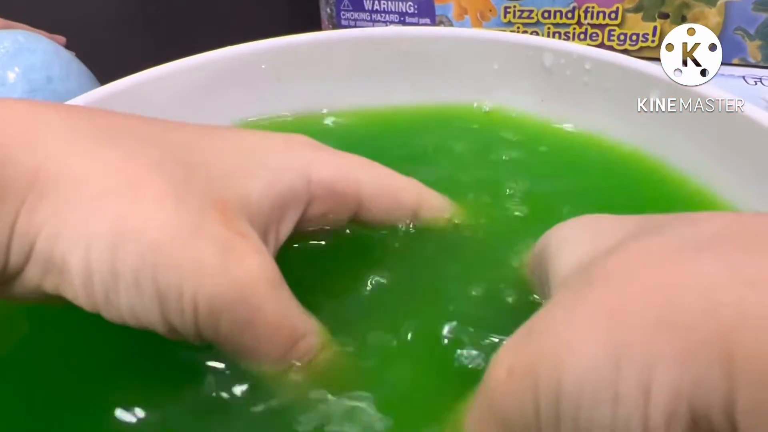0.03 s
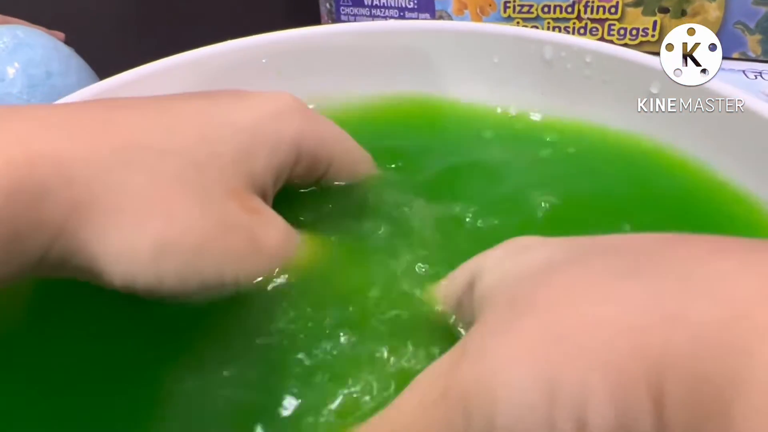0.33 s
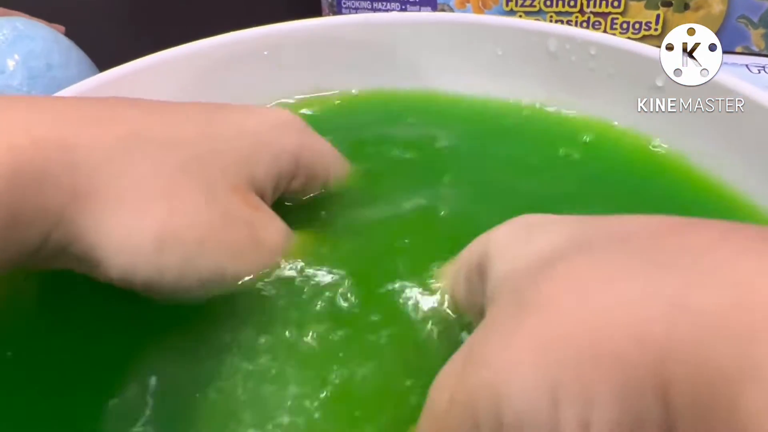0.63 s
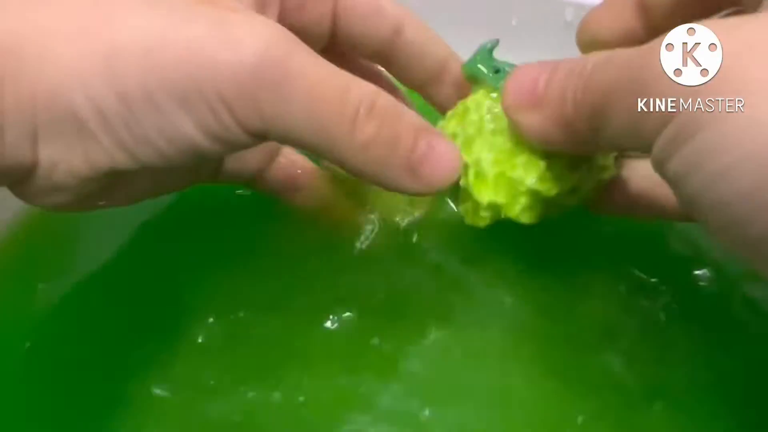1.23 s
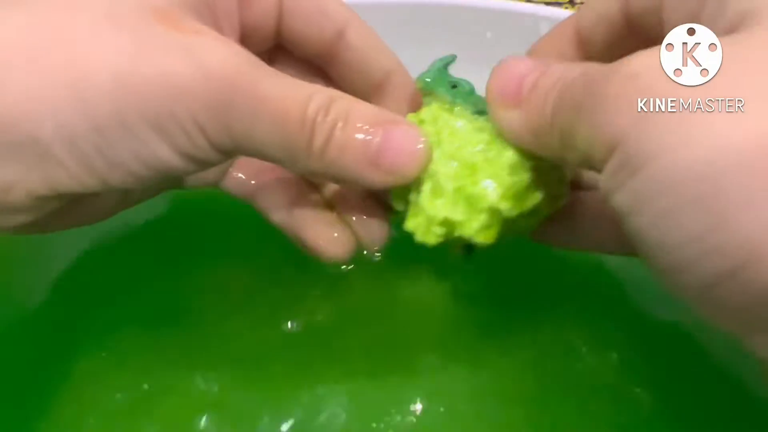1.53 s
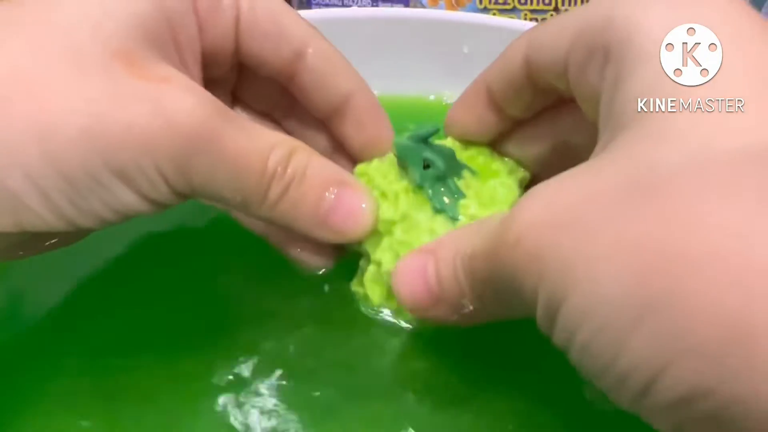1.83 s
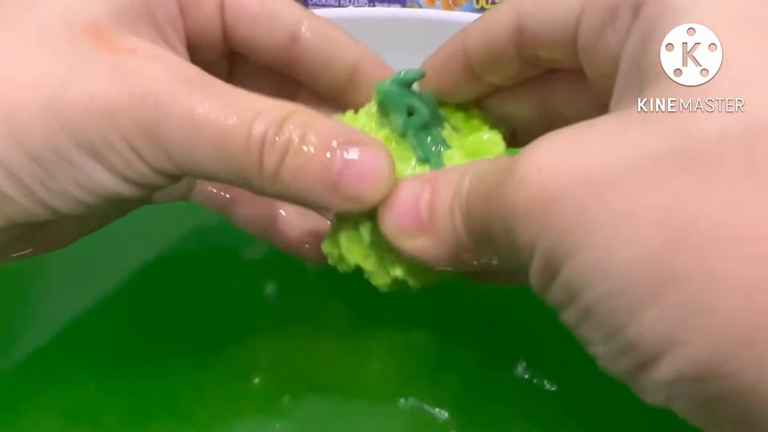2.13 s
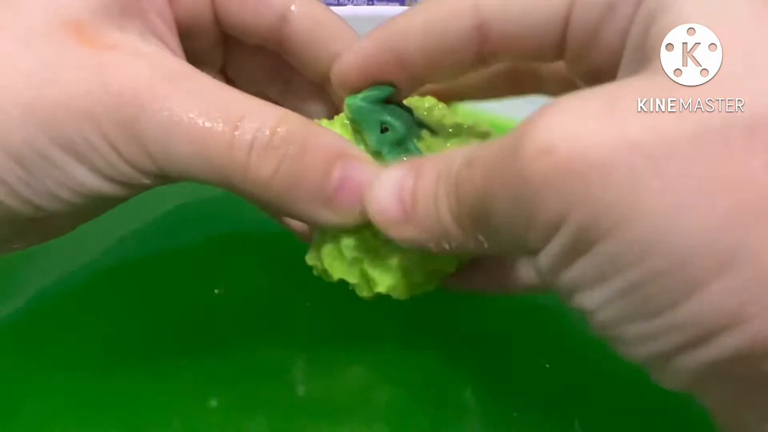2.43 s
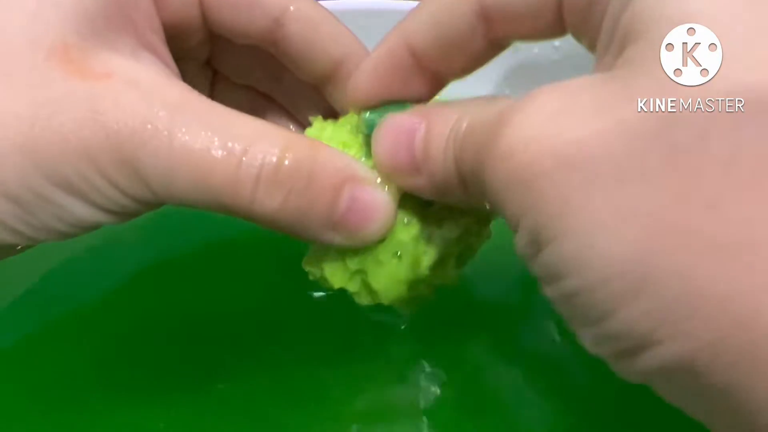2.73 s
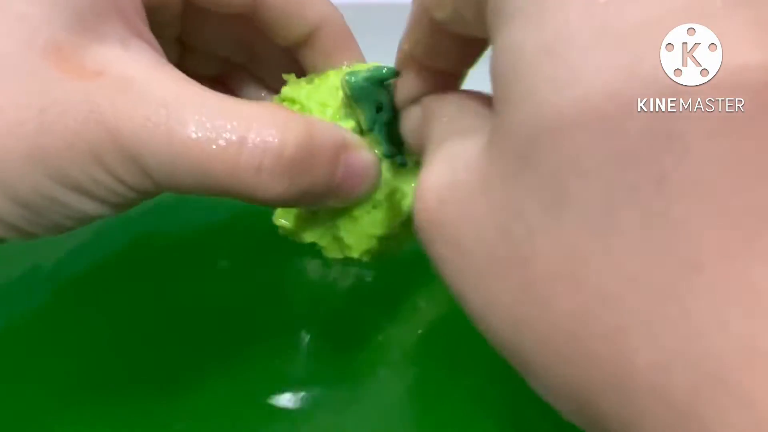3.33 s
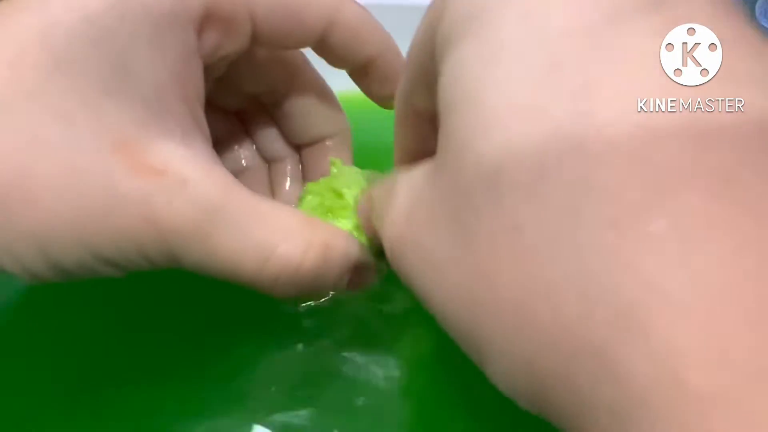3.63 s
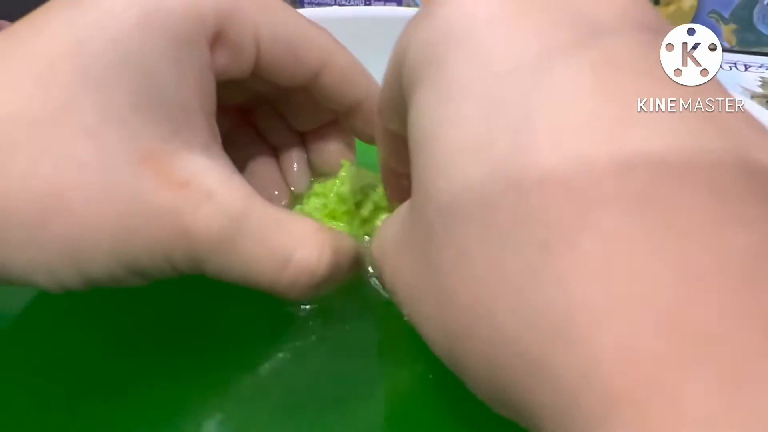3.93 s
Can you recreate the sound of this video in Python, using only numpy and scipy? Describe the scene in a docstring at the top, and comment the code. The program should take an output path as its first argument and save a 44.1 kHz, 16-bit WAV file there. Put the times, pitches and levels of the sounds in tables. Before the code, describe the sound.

Close to the microphone, a dissolving bath bomb gives a dense, high fizz throughout. Small splashes and sloshes in a plastic bowl come first, then wet, foamy crackling as hands hold it above the water. The room hums faintly.

```python
"""A fine, dense fizz is heard close by: a bath bomb releases gas in a plastic bowl of water, and each
bursting bubble rings briefly, the smaller the higher. Fingers fish for the bomb with small splashes
that set the bowl ringing, and lift it out at 1.2 s. The wet foam then crackles in the cupped hands,
a cavity resonator that rings higher as they close and lower the bomb back to the water.
The room hums quietly behind it all; the sound is mono."""
import sys
import numpy as np
from scipy import signal
from scipy.fft import rfft, irfft
from scipy.io import wavfile

SR = 44100
rng = np.random.default_rng(int(sys.argv[2]) if len(sys.argv) > 2 else 0)


def to_wav(sig):
    """Store sig (one row per channel, or 1-D mono) as 16-bit WAV at the path in sys.argv[1].

    Samples outside -1..1 are clipped; the rate is SR.
    """
    pcm = np.clip(np.atleast_2d(sig), -1, 1) * 32767
    pcm = np.round(pcm).astype(np.int16)
    wavfile.write(sys.argv[1], SR, pcm.T)  # frames by channels


N = 176400
TIME = np.arange(N) / SR

# fine fizz (time [s], level [dB])
FIZZ_LEVEL = [(0, -53), (.2, -54), (.33, -49), (.44, -48.5), (.6, -49.5), (.82, -51.5), (.93, -47.5),
              (1.05, -47.5), (1.25, -49.5), (1.6, -47.5), (1.9, -49), (2.1, -48), (2.64, -46), (3.1, -49.5),
              (3.42, -47.5), (3.65, -52.5), (3.92, -49), (4, -48)]
# its spectrum (frequency [Hz], relative density [dB])
FIZZ_SPECTRUM = [(1000, -24), (3500, -13.5), (5200, -13), (6500, -3), (7900, -5.5), (8700, 0.8),
                 (9500, -0.5), (11200, 0.5), (12300, -7), (14000, -22), (15700, -31)]
# sputtering, deepest while the bomb is under water (time [s], rms depth [dB])
SPUTTER_DEPTH = [(0, 2.5), (1.1, 3.5), (1.5, 0.94), (4, 1.27)]
# finest bubbles bursting in the open air (time [s], level [dB])
PRICKLE_LEVEL = [(0.0, -66), (0.01, -57), (0.57, -50.5), (0.7, -50.5), (1.04, -48.5), (2.0, -48.5),
                 (2.06, -47), (3.45, -48), (3.56, -51.5), (4.0, -49.5)]
# their spectrum (frequency [Hz], relative density [dB])
PRICKLE_SPECTRUM = [(6000, -33), (10500, -8), (12500, -6), (14000, -4), (15700, -3.5)]
# narrow band of sizzling fizz near 7.5 kHz (time [s], frequency [Hz], level [dB])
SIZZLE = [(0, 7900, -62), (.22, 7600, -61), (.55, 7950, -52.5), (.8, 7750, -55), (.94, 7360, -54.5),
          (1.2, 7600, -58.5), (1.45, 7430, -48.5), (1.85, 7400, -62), (2.06, 7600, -52.5),
          (2.75, 7450, -62), (3.25, 7500, -56.5), (3.6, 7300, -68), (4, 7300, -67)]
# two modes of the hollow of the hands (time [s], frequency [Hz], level before the high-pass [dB])
HAND_MODE_1 = [(0, 4600, -64.5), (.22, 4480, -68), (.45, 4540, -67), (1.12, 4200, -62.5),
               (1.3, 4700, -51.5), (1.85, 4630, -53), (2.1, 4740, -52), (2.55, 4750, -50.5),
               (2.76, 4800, -48.5), (2.88, 4550, -53), (3.25, 4820, -53), (3.46, 4800, -53.5),
               (3.58, 5300, -58), (3.9, 5870, -50), (4, 5600, -53)]
HAND_MODE_2 = [(0, 5800, -77), (.2, 5600, -70), (.5, 5640, -59.5), (1.1, 5750, -62), (1.27, 5830, -58),
               (1.7, 5900, -54.5), (2.4, 6060, -53.5), (2.75, 5300, -54.5), (3.2, 5940, -51),
               (3.48, 5950, -53.5), (3.58, 6250, -55), (3.9, 6550, -54), (4, 6300, -56)]
# deep resonance of the closed palms (time [s], level [dB])
PALM_LEVEL = [(0, -75), (1.2, -72), (1.7, -71), (1.83, -59), (2.1, -68.5), (2.8, -78), (3.0, -73),
              (3.12, -57.5), (3.24, -69.5), (3.45, -60), (3.6, -68), (4, -65)]
# coarse crackle of wet foam (time [s], level [dB])
FOAM_LEVEL = [(0, -86), (.08, -54.5), (.14, -72), (.22, -66), (.3, -62.5), (.6, -58.5), (.78, -56),
              (.97, -59), (1.1, -53.5), (1.5, -52), (1.85, -51), (2.42, -52.5), (2.7, -56.5), (2.92, -57.5),
              (3.13, -57.5), (3.46, -59), (3.55, -65.5), (3.72, -57.5), (4, -58.5)]
# its spectrum (frequency [Hz], relative density [dB])
FOAM_SPECTRUM = [(400, -10), (1100, -12), (1600, -4.5), (2300, -2.5), (2900, -5.5), (3500, -5),
                 (4500, -5.5), (7000, -18)]
# larger bubbles bursting (time [s], peak level [dB], frequency [Hz], decay time [s])
LARGE_BUBBLES = [(.270, -42, 3870, 0.00088), (.3668, -33.5, 4050, 0.00046), (.4022, -39, 3740, 0.00068),
                 (0.4143, -37.5, 4120, 0.0013), (0.4645, -39, 4570, 0.0012), (.665, -41, 5500, .002),
                 (0.7683, -43, 4600, 0.0033), (0.786, -37.5, 4540, 0.0014), (0.795, -41, 2850, 0.0016),
                 (0.9195, -41, 6450, .002), (0.9387, -38, 6620, .004), (1.076, -42, 2630, .002),
                 (1.122, -47, 2700, 0.0023), (1.159, -41, 2860, 0.0033), (1.184, -40.5, 3740, 0.0027),
                 (1.245, -42, 5700, 0.01), (1.336, -41, 4570, 0.0022), (1.402, -39, 4430, 0.0041),
                 (1.631, -40, 7600, .002), (1.994, -42, 4350, 0.0027), (2.021, -42, 4380, .002),
                 (2.054, -42, 7460, .002), (2.067, -38, 6060, .0015), (2.77, -39.5, 4450, 0.0023)]
# low gulps as the bomb leaves the water (time [s], peak level [dB], frequency [Hz], decay time [s])
GULPS = [(1.209, -43.5, 326, 0.0071), (1.216, -39.5, 206, 0.0058), (1.227, -35.5, 86, 0.015),
         (1.283, -42.5, 110, .015)]
# fingers striking the water (time [s], gain [dB], frequency [Hz])
SPLASHES = [(.068, -45.5, 1450), (.081, -46, 2230), (.211, -46, 1110), (.255, -39.5, 960),
            (.320, -38.5, 2000), (.337, -43, 1920), (.341, -40.5, 635), (.468, -37, 1100),
            (.485, -36, 1380), (0.5863, -36, 2030), (0.5881, -29, 910), (.5905, -35, 1240),
            (.595, -41, 810), (.5975, -31, 1560), (.602, -38, 1400), (.6165, -35.5, 1380),
            (.629, -39, 1100), (.74, -39.5, 1700), (.832, -41, 1840), (1.209, -54, 725), (1.22, -45, 447),
            (3.513, -45, 1490)]
# water sloshing round the fingers and squelching on the bomb (time [s], level [dB])
SLOSH_LEVEL = [(0, -72), (.09, -58), (.18, -59), (.28, -55.5), (.35, -60), (.42, -57), (.5, -58.5),
               (.56, -55), (.61, -55), (.68, -62), (1.0, -69), (1.17, -74), (1.22, -54), (1.33, -66),
               (1.7, -68), (2.3, -62.5), (2.6, -69.5), (3.19, -64), (3.27, -56), (3.34, -70), (3.46, -57.5),
               (3.58, -75), (4, -76)]
# its spectrum (frequency [Hz], relative density [dB])
SLOSH_SPECTRUM = [(200, -23), (450, -0.5), (680, -1.5), (830, -5), (1000, -0.5), (1400, -7.5),
                  (2200, -15.5), (4000, -16)]
# modes of the plastic bowl (frequency [Hz], relative level [dB], time to fall 60 dB [s])
BOWL_MODES = [(713, 21.5, 0.16), (947, -1, 0.05), (1150, -16.5, .08), (1420, 2, 0.17), (1487, 18, 0.031)]
# tones of the room's hum (frequency [Hz], level [dB])
HUM_TONES = [(49, -57.5), (148, -57.5), (276, -68.5), (686, -75.5)]
# room rumble (frequency [Hz], relative density [dB])
RUMBLE_SPECTRUM = [(20, -48), (33, -40), (44, -12), (60, 2), (90, -0.5), (125, -0.5), (160, 0.5),
                   (200, -9.5), (235, -11.5), (280, -3), (340, -10), (450, -17), (700, -21), (1000, -23.5),
                   (2000, -28.5), (6000, -37), (16000, -58)]

BUBBLE_RISE_S, GULP_RISE_S = 0.00055, 0.0022


def fizz():
    """Bubble resonance: thousands of tiny gas bubbles burst each second, each a damped oscillator."""
    clicks = pops(per_s=12000, spread_db=2, clump_db=0.84)
    grains = ringing(clicks, low_hz=5260, high_hz=14000, decay_cycles=1.5, sizes=28)
    return amp(curve(FIZZ_LEVEL)) * sputtering(coloured(grains, FIZZ_SPECTRUM))


def prickle():
    """Superposition: the smallest bubbles burst so densely that they merge into a very high hiss."""
    clicks = pops(per_s=18000, spread_db=2.5, clump_db=1.0)
    return amp(curve(PRICKLE_LEVEL)) * coloured(clicks, PRICKLE_SPECTRUM)


def sizzle():
    """Narrow-band noise: a band of sizzling fizz swells and drifts in pitch."""
    return moving_band(SIZZLE, width_hz=1700)


def cupped_hands():
    """Cavity resonance: pops excite the air between the hands, whose modes shift as the hands close."""
    modes = moving_band(HAND_MODE_1, width_hz=1510) + moving_band(HAND_MODE_2, width_hz=1350)
    foam_clicks = pops(per_s=3500, spread_db=3, clump_db=4.3)
    palms = amp(curve(PALM_LEVEL)) * resonate(foam_clicks, hz=1620, width_hz=430)
    return modes + palms


def foam():
    """Resonant frequency falls with size: the coarser bubbles of the wet foam crackle below the fizz."""
    clicks = pops(per_s=3500, spread_db=2, clump_db=0.85)
    grains = ringing(clicks, low_hz=890, high_hz=4400, decay_cycles=1.52, sizes=16)
    return amp(curve(FOAM_LEVEL)) * sputtering(coloured(grains, FOAM_SPECTRUM))


def film_snaps(gain_db=-2.5, decay_s=0.0017):
    """Film rupture: each larger bubble tears open with a short pulse of noise around its pitch."""
    out, t = np.zeros(N), np.arange(SR // 50) / SR
    for start_s, db, hz, _ in LARGE_BUBBLES:
        snap = noise_band(t, hz, log_width=0.25) * np.exp(-t / decay_s)
        add(out, start_s, amp(db + gain_db) * snap)
    return out


def bubble_tones(table, rise_s, glide=0.01):
    """Damped oscillation: each pocket of air rings as a dying tone that rises slightly in pitch."""
    out, t = np.zeros(N), np.arange(SR // 8) / SR
    for start_s, db, hz, decay_s in table:
        envelope = (1 - np.exp(-t / rise_s)) * np.exp(-t / decay_s)
        cycles = np.cumsum(hz * (1 + glide * np.tanh(t / decay_s))) / SR
        add(out, start_s, amp(db) * envelope / envelope.max() * np.sin(2 * np.pi * cycles))
    return out


def splashes(slap_decay_s=0.0014, tail_db=-22.5, tail_decay_s=0.029):
    """Impact on water: a finger makes a heavily damped, pitched slap and a short spatter after it."""
    out, t = np.zeros(N), np.arange(SR // 10) / SR
    attack = 1 - np.exp(-t / BUBBLE_RISE_S)
    for start_s, db, hz in SPLASHES:
        spatter = noise_band(t, hz, log_width=0.57)
        slap = (1.7 * np.sin(2 * np.pi * hz * t) + 0.39 * spatter) * np.exp(-t / slap_decay_s)
        tail = amp(tail_db) * spatter * np.exp(-t / tail_decay_s)
        add(out, start_s, amp(db) * attack * (slap + tail))
    return out


def slosh():
    """Random impulse excitation: moving water makes clumps of small slaps, each ringing briefly."""
    clicks = pops(per_s=1200, spread_db=4.5, clump_db=1.5)
    grains = ringing(clicks, low_hz=385, high_hz=1980, decay_cycles=2.0, sizes=12)
    return amp(curve(SLOSH_LEVEL)) * coloured(grains, SLOSH_SPECTRUM)


def bowl(drive, relative_db=-12.5):
    """Modal vibration: each splash excites the plastic bowl, whose modes decay exponentially."""
    t = np.arange(SR // 5) / SR
    response = sum(amp(db - 60 * t / t60) * np.sin(2 * np.pi * hz * t) for hz, db, t60 in BOWL_MODES)
    return amp(relative_db) * drive.std() * unit(signal.fftconvolve(drive, response)[:N])


def reverberation(direct, relative_db=-12.5, t60_s=0.25, delay_s=0.003):
    """Diffuse reflection: the room returns the sound as a short, exponentially decaying tail."""
    t = np.arange(SR // 3) / SR
    tail = rng.standard_normal(len(t)) * amp(-60 * t / t60_s) * (t > delay_s)
    return amp(relative_db) * signal.fftconvolve(direct, tail / np.linalg.norm(tail))[:N]


def room_hum(waver=0.72, waver_hz=10.8, rumble_db=-52):
    """Random modulation: low tones waver in amplitude and phase above a steady rumble."""
    hum = np.zeros(N)
    for hz, db in HUM_TONES:
        modulation = 1 + waver * (wander(waver_hz) + 1j * wander(waver_hz))
        hum += amp(db) * unit((modulation * np.exp(2j * np.pi * hz * TIME)).real)
    return hum + amp(rumble_db) * coloured(rng.standard_normal(N), RUMBLE_SPECTRUM)


def pops(per_s, spread_db, clump_db):
    """Shot noise: independent clicks, mostly small, whose strength swells and sinks in clumps."""
    click_db = spread_db * np.minimum(rng.exponential(1, N), 5.5)
    strength = amp(click_db + clump_db * wander(hz=60))
    return strength * rng.choice([-1, 1], N) * (rng.random(N) < per_s / SR)


def ringing(clicks, low_hz, high_hz, decay_cycles, sizes):
    """Impulse response: each click rings a bubble of random size; the sum is evened to a flat spectrum."""
    size_of_click, t = rng.integers(0, sizes, N), np.arange(SR // 40) / SR
    spectrum, power = 0, 0
    for size, hz in enumerate(np.geomspace(low_hz, high_hz, sizes)):
        ring = np.exp(-t * hz / decay_cycles) * np.sin(2 * np.pi * hz * t)
        response = rfft(unit(ring), N)
        spectrum += response * rfft(clicks * (size_of_click == size))
        power += abs(response) ** 2
    return irfft(spectrum / np.sqrt(power), N)


def sputtering(x, patch_hz=370, patch_s=0.033, frame=256):
    """Spectral modulation: swarms of like-sized bubbles come and go, lifting patches of the spectrum."""
    spectrogram, hop_s = signal.stft(x, nperseg=frame)[2], frame / 2 / SR
    bands, frames = spectrogram.shape
    across = np.fft.fftfreq(bands, SR / frame)[:, None] * patch_hz / 2
    along = np.fft.fftfreq(frames, hop_s) * patch_s / 2
    blur = np.exp(-2 * np.pi ** 2 * (across ** 2 + along ** 2))  # smooths across frequency, along time
    speckle = rng.standard_normal(spectrogram.shape)
    patches = unit(np.fft.ifft2(np.fft.fft2(speckle) * blur).real)
    depth_db = np.interp(np.arange(frames) * hop_s, *np.transpose(SPUTTER_DEPTH))
    return unit(signal.istft(spectrogram * amp(depth_db * patches), nperseg=frame)[1][:N])


def moving_band(track, width_hz):
    """Band-pass filtering: sputtering pops follow a track of frequency and level."""
    clicks = sputtering(pops(per_s=4000, spread_db=3, clump_db=0.9))
    band = amp(curve(track, column=2)) * resonate(clicks, curve(track), width_hz)
    return high_pass(band, hz=3720, order=8)


def resonate(x, hz, width_hz):
    """Resonance: three cascaded poles, each width_hz wide, follow a fixed or moving frequency."""
    carrier = np.exp(2j * np.pi * np.cumsum(hz * np.ones(N)) / SR)
    pole = np.exp(-np.pi * width_hz / SR)
    baseband = x / carrier
    for _ in range(3):
        baseband = signal.lfilter([1 - pole], [1, -pole], baseband)
    return unit((carrier * baseband).real)


def noise_band(t, hz, log_width):
    """Band noise: random phases under a bell curve in log frequency, centred on one pitch."""
    f = np.fft.rfftfreq(len(t), 1 / SR)
    band = np.exp(-.5 * (np.log((f + 1) / hz) / log_width) ** 2)
    return unit(irfft(band * np.exp(2j * np.pi * rng.random(len(band))), len(t)))


def coloured(x, spectrum):
    """Spectral shaping by a curve on a log-frequency axis; the result has rms 1."""
    hz, db = np.transpose(spectrum)
    f = np.fft.rfftfreq(N, 1 / SR)
    gain = amp(np.interp(np.log(f + 1), np.log(hz), db))
    return unit(irfft(rfft(x) * gain, N))


def wander(hz):
    """Low-pass noise: random motion up to about the given rate."""
    f = np.fft.rfftfreq(N, 1 / SR)
    return unit(irfft(rfft(rng.standard_normal(N)) * np.exp(-(f / hz) ** 2), N))


def high_pass(x, hz, order):
    """Attenuation below a cutoff frequency."""
    return signal.sosfilt(signal.butter(order, hz, "high", fs=SR, output="sos"), x)


def amp(db):
    """Decibels to amplitude ratio."""
    return 10 ** (np.asarray(db) / 20)


def unit(x):
    """Normalisation to rms 1."""
    return x / np.sqrt(np.mean(x ** 2) + 1e-20)


def curve(table, column=1):
    """Linear interpolation of one column over time."""
    table = np.array(table)
    return np.interp(TIME, table[:, 0], table[:, column])


def add(mix, start_s, sound):
    """Superposition of a sound on the mix at its start time."""
    part = mix[max(round(start_s * SR), 0):][:len(sound)]
    part += sound[:len(part)]


def scene():
    """Superposition: gas, water and room add linearly, the same in both channels."""
    slaps = splashes()
    gas = fizz() + prickle() + cupped_hands() + sizzle() + foam()
    gas += film_snaps() + bubble_tones(LARGE_BUBBLES, BUBBLE_RISE_S)
    water = slaps + slosh() + bubble_tones(GULPS, GULP_RISE_S)
    direct = gas + water + bowl(slaps)
    return np.tile(direct + reverberation(direct) + room_hum(), (2, 1))


def record(dry, bass_cut_hz=48, treble_cut_hz=15800):
    """Band limiting: steep filters remove the deepest bass and the highest treble."""
    low_pass = signal.firwin(801, treble_cut_hz, window=("kaiser", 8), fs=SR)
    return signal.oaconvolve(high_pass(dry, bass_cut_hz, order=6), low_pass[None], "same")


dry = scene()
out = record(dry)
to_wav(out)
```